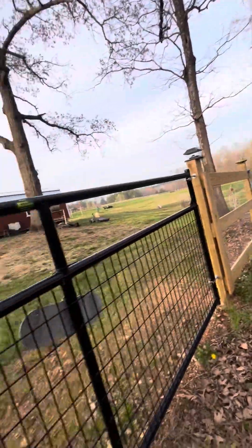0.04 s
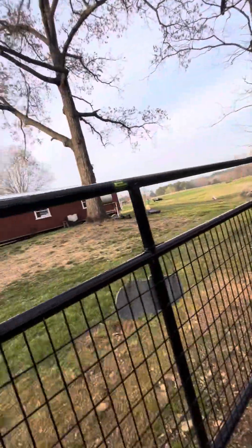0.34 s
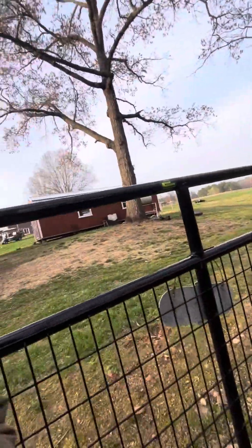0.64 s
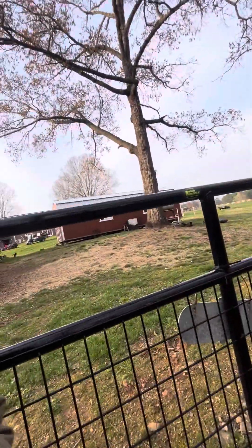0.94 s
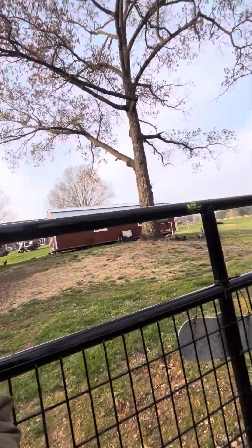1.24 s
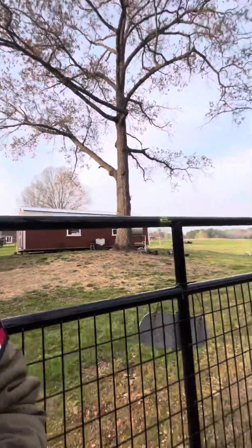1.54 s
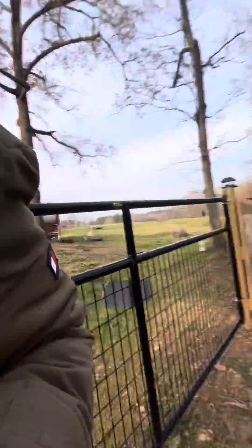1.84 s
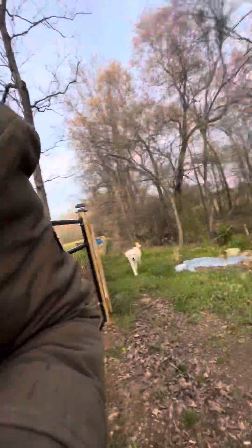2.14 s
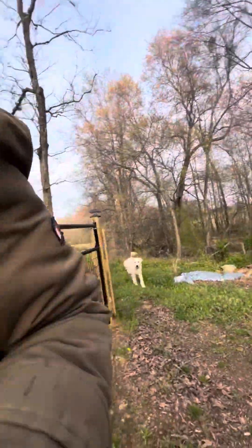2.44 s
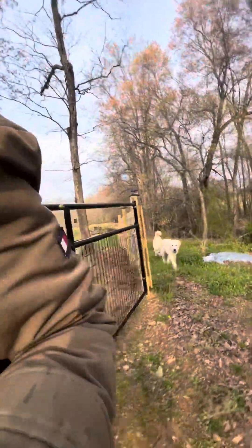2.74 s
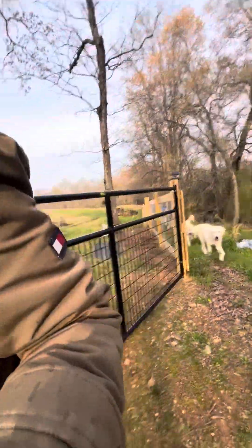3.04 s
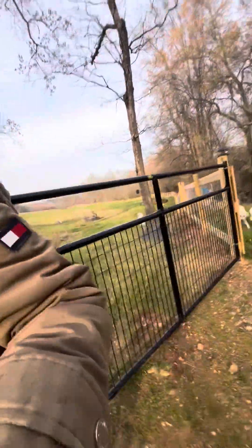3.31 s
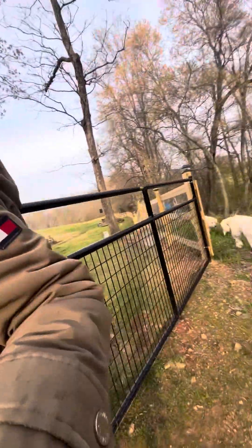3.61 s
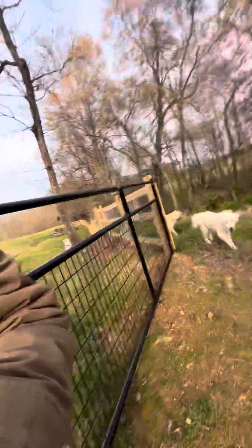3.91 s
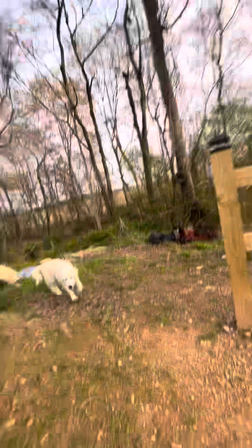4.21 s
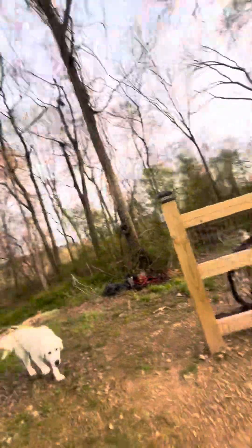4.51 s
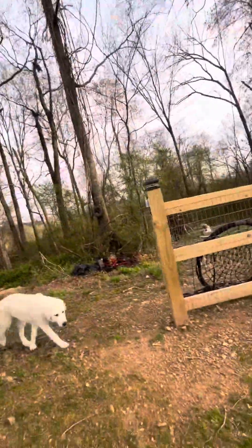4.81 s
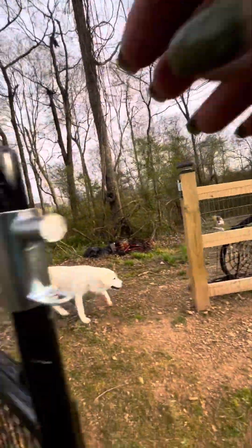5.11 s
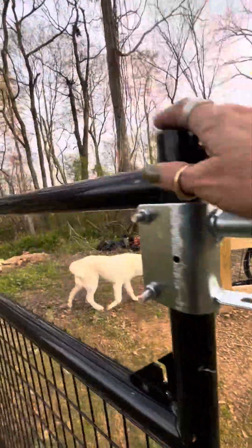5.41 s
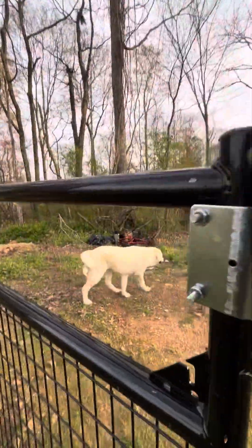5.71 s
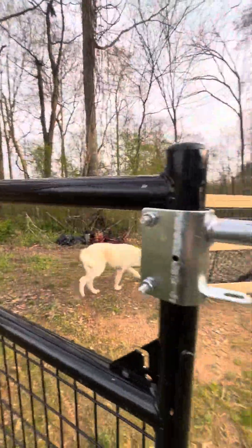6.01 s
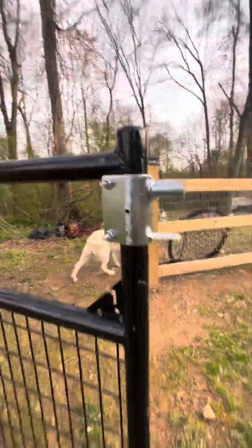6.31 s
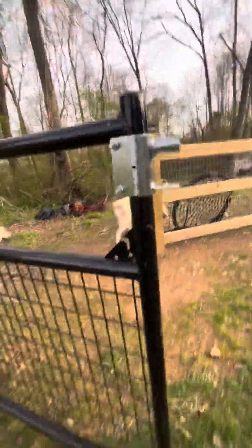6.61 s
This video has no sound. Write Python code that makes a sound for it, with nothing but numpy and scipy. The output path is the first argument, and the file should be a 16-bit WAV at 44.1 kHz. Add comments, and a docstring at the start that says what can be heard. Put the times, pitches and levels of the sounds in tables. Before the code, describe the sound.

A metal gate's bolt scrapes and clacks, then the frame clanks and rings briefly, with close handling knocks over a low hum.

```python
"""A tubular steel gate with mesh infill is unlatched and swung open, an arm's length from a hand-held phone.
The bolt scrapes and clacks, the frame clanks, the hinge pings, the mesh buzzes; the rail sings once let go.
Each contact rings the modes of a steel part. Fingers knock and creak on the phone's case.
A jacket and dry leaves rustle; a distant engine hums under the garden air."""
import sys
import numpy as np
from scipy import signal
from scipy.fft import rfft, irfft, next_fast_len
from scipy.io import wavfile
from scipy.ndimage import uniform_filter1d

SR = 44100
rng = np.random.default_rng(int(sys.argv[2]) if len(sys.argv) > 2 else 0)


def log_audio(samples):
    """Write samples as a 16-bit WAV file to the path given in sys.argv[1]."""
    # one column per channel
    frames = np.atleast_2d(samples).T
    # limit to full scale, then quantise
    limited = np.clip(frames, -1, 1)
    pcm = np.round(limited * 32767).astype(np.int16)
    wavfile.write(sys.argv[1], SR, pcm)


N = 297688

# Contacts on steel. Each row: start in seconds; crack, bass, mid, high and top levels in dB;
# left minus right in dB; chatter decay in seconds; mesh level in dB.
BOLT_SCRAPES = [(0.993, -24, -40, -31.5, -34, -51, -1.5, 0.027, -1),
                (1.058, -25, -39.5, -31, -34, -55, -2, 0.0048, 6),
                (1.069, -23, -40.5, -26, -33.5, -52, -3, 0.0045, 0),
                (1.079, -22, -41, -25.5, -34, -51, 1.5, 0.0035, -2.5),
                (1.108, -24, -35, -29, -36.5, -57, -2, 0.0042, 0),
                (1.339, -37, -31.5, -38, -42.5, -65, -4.5, 0.032, 17),
                (1.388, -27, -41, -40, -37.5, -54.5, 3, 0.004, 5)]
BOLT_CLACKS = [(1.412, -27, -49, -52, -41, -42, 1.2, 0.003, -12),
               (1.424, -19, -50, -40, -43, -49, 1.2, 0.0015, -7),
               (1.435, -25, -39, -43, -41, -45, 1.2, 0.0034, -5),
               (1.453, -24, -40, -43, -34, -37, 1.2, 0.007, -5),
               (1.461, 3.5, -17, -18.5, -17.5, -20.5, 1.3, 0.005, -5.5),
               (1.510, -27, -27.5, -24, -35.5, -26.5, 2.1, 0.018, -8)]
BRACKET_TAPS = [(1.603, -16, -45, -23, -22, -24.5, -1.5, 0.0021, 1.3)]
FRAME_CLANKS = [(1.233, -18, -33, -27, -31.5, -56, -5, 0.00079, -2),
                (1.77, -9, -32, -19.5, -27, -42.5, -1.5, 0.0018, -1.5),
                (3.674, -5, -30.5, -21, -18.5, -37.5, -5, 0.0027, 5),
                (3.694, -8, -38.5, -26, -23.5, -29, -3, 0.0043, -5),
                (3.941, -31, -54, -34.5, -45.5, -70, -3, 0.0022, 11),
                (4.127, -14, -38.5, -25, -23.5, -48, -2, 0.00084, 1),
                (4.144, -23, -38.5, -54, -33, -54, -7, 0.0012, -1)]
RING_CLICKS = [(5.3505, -12, -50, -54.5, -29.5, -45.5, -0.81, 0.001, -4)]
# Steel modes. Each row: frequency in Hz, level in dB, T60 in seconds.
LATCH_MODES = [(402,3,.11),(485,-8,.09),(655,-7,.08),(868,-7,.09),(973,-1,.1),(1237,-4,.2),(1632,-10,.08),(1741,-9,.1),(1955,-3,.11),(3040,-5,.04),(3760,-3,.05),(4308,-3,.07),(4800,-6,.05),(4890,-8,.05),(5001,-11,.1),(5900,-3,.07),(6540,-2,.05),(6585,-2,.06),(8350,-6,.08),(8400,-3,.14),(9255,-9,.12),(11860,-15,.12),(13845,-7,.1)]
BRACKET_MODES = [(1150,-5,.06),(1378,-12,.25),(2283,-7,.29),(2380,-6,.2),(2961,-8,.12),(3550,-6,.08),(3978,-4,.09),(4269,-2,.14),(4600,-1,.12),(4750,0,.1),(4810,1,.14),(5200,-3,.12),(5640,-4,.18),(6200,-5,.1),(7343,-6,.08),(7560,-4,.11),(8060,-5,.07),(11370,0,.064),(12100,-4,.07),(12800,-3,.06)]
FRAME_MODES = [(237,-16,1.5),(385,-17,.9),(506,-19,.7),(689,-9,.4),(1267,-9,.45),(1390,-11,.6),(1562,-8,.4),(1857,-13,.4),(2200,3,.3),(2300,-8,.3),(2440,-8,.22),(2657,-7,.2),(2702,-8,.22),(2960,-10,.16),(3140,-2.5,.2),(3356,1,.15),(3385,-2,.13),(4156,-9,.16),(4275,-2,.14),(4330,-3,.12),(4603,-12,.18),(4750,-8,.15),(5146,-7,.17),(5485,-6,.13),(5650,-8,.13),(6379,-5,.2),(6950,-10,.16),(7471,-1,.22)]
HINGE_MODES = [(2200,-12,.15),(3140,0,.13),(3165,-8,.08),(3356,-10,.1)]
POST_MODES = [(2410,-15,.08),(3370,-15,0.094),(3550,-10,.04),(5050,-1,0.016),(5206,0,0.02),(5600,-7,0.025),(6800,2.5,0.027),(7200,2,0.013),(7230,1,0.025)]
# Bolt sleeve and phone case. Each row: frequency in Hz, width in Hz, level in dB.
SLEEVE_RESONANCES = [(601,8.1,-9.5),(1143,37,-0.5),(1320,41,-7),(2246,16,-2),(2465,7.6,-1),(2690,31,-9.5),(2830,16,-13),(3890,37,2.5),(4290,15,-9.5),(4870,19,-5.5),(5160,100,8),(5840,61,8),(7300,46,0)]
CASE_RESONANCES = [(680,90,-1),(1550,280,0)]
# Rail notes, short while a hand holds the gate.
# Each row: start in seconds, frequency in Hz, level in dB, T60 in seconds, left phase lead in radians.
RAIL_NOTES = [(1.235,689.3,-38.5,1.9,2.4),(1.236,2200,-37.5,0.38,0.8),(1.235,5485,-40,.13,3),(1.235,5650,-41,.13,3.5),
              (1.771,237,-54,0.92,1.7),(1.773,689.3,-43,0.34,1.1),(1.772,2195,-36,0.21,1),(1.771,5485,-47,0.088,3.8),(1.773,5650,-40,0.1,2.3),
              (3.676,1262,-34.5,0.57,0.78),(3.676,689.3,-35.5,1.5,1.4),(4.129,689.3,-44,12.7,2.2)]
# Rail at the moving phone. Each row: time in seconds, gain in dB, left minus right in dB.
RAIL_PLACEMENT = [(1.25,6,-5.5),(2.2,14,-2.5),(3.7,-0.5,-16.5),(4.13,3,-9.5),(4.27,5.5,-7),(4.45,8,-7.5),(4.72,-0.5,-7.5),(5,5.5,-0.5),(5.6,4,-6),(6.75,3,3)]
# Short events. Each row: start in seconds, level in dB.
HINGE_PINGS = [(1.985,-46),(2.003,-47),(3.234,-44),(3.697,-22),(3.868,-38.5),(3.937,-44),(3.962,-44)]
MESH_SHIVERS = [(1.331,-40),(1.72,-50.5),(3.72,-45.5),(4.199,-45.5)]
DRY_SNAPS = [(0.285, -42), (2.6198, -44), (2.837, -41), (3.078, -36.5), (3.829, -34), (3.999, -39),
             (4.048, -34.5), (4.592, -38.5), (5.295, -37), (5.3044, -41.5), (5.7472, -41), (5.763, -31),
             (6.0322, -37.5), (6.1557, -45)]
# Knocks on the case. Each row: start in seconds, level in dB, centre in Hz, click level in dB,
# softness in dB per octave squared, travel time at 1 kHz in seconds.
CASE_KNOCKS = [(4.8151,-5.5,1770,-10,3.5,0.0021),(4.8249,-13,1630,2.5,4,.0025),(4.8244,-6.5,1100,-35.5,3,.003),(4.842,-20,1550,-40,15,0.0031),(4.8526,-22,764,-45,16,0.0031),(6.321,-36.5,1600,-26,0.5,.003),(6.4182,-36.5,1900,-13,1.5,0.0027),(6.469,-34,1000,-27,4,0.0028),(6.515,-22.5,1020,-31,6,0.0028),(6.537,-25,900,-26,4,0.00355),(6.567,-32,600,-24,8,0.0029),(6.588,-31.5,1440,-31,-0.5,0.0027),(6.593,-22.5,740,-40,6,0.0031),(6.6732,-11,1010,-39,10,.0022)]
# Hand jolts. Each row: centre in seconds, level in dB, frequency in Hz, half length in seconds.
HAND_BUMPS = [(2.147,-25.5,62.4,0.02),(5.172,-30.5,57.7,0.033)]
# Rubbing strokes. Each row: centre in seconds, level in dB, half length in seconds.
FINGER_RUBS = [(6.402,-49,0.045),(6.498,-47,0.029),(6.57,-55.5,0.028)]
JACKET_SWISHES = [(0.22,-66,0.3),(1.58,-57.5,0.42),(1.998,-55,0.04),(2.192,-58,0.075),(3.104,-56,0.03),(3.203,-54,0.11),(3.496,-54.5,0.094),(3.79,-48.5,0.086),(4.116,-52,0.099),(4.427,-54,0.088),(4.782,-51,0.055),(5.364,-62,0.1),(5.637,-54.5,0.032),(5.81,-55,0.05),(6.165,-60,0.073)]
# Shoe scuffs. Each row: peak time in seconds, level in dB, band anchor in Hz, rise and fall in seconds.
SHOE_SCUFFS = [(0.291,-52,2500,.007,0.035),(2.005,-51.5,2400,.02,0.022),(3.079,-51.5,1830,0.0041,0.08),(3.23,-48,2400,0.069,0.095),(4.32,-41.5,872,0.022,0.038),(4.5,-49.5,494,0.092,0.11),(4.63,-48.5,900,0.013,0.055),(4.766,-58,4000,0.2,0.25),(6.39,-57,2940,0.017,0.047),(6.49,-57.5,2920,0.023,0.027)]
# Engine speed. Each row: time in seconds, firing rate in Hz.
FIRING_HZ = [(0,115.1),(2.5,115.5),(3.1,110.7),(3.6,113.3),(4.6,112.2),(5.3,111),(6.75,105.6)]
# Engine note, and its octave relative to it. Each row: time in seconds, level in dB.
ENGINE_DB = [(0.0, -42.5), (1.09, -38.5), (1.26, -42.5), (2.56, -39), (2.71, -45), (2.74, -52.5),
             (3.44, -39), (5.08, -38.5), (5.15, -31.5), (5.3, -45), (5.36, -37.5), (5.86, -39.5),
             (5.94, -50.5), (6.03, -37.5), (6.15, -46.5), (6.75, -45.5)]
OCTAVE_DB = [(0,-31),(5.5,-31.5),(6.2,-11.5),(6.75,-14)]
# Open air. Each row: time in seconds, level in dB, an unused value.
AIR_DB = [(0,-54.5,0),(.6,-56,0),(2.3,-52.5,2),(2.9,-53,-2),(3.55,-53.5,1),(4.3,-51.5,2),(5.4,-54.5,22),(6.75,-52.5,-1)]
# Spectra and responses. Each row: frequency in Hz, gain in dB.
MESH_RADIATION_DB = [(1300,-0.5),(1450,-1.5),(1700,5),(3350,5),(3600,-3.5),(3850,0),(4250,9.5),(5000,5)]
MESH_SPECTRUM_DB = [(150,0),(320,-1.5),(600,-1),(1200,1.5),(1800,1.5),(2600,-12),(4000,-19.5),(8000,-37),(15000,-46)]
CASE_RESPONSE_DB = [(100,-3),(200,10.5),(400,-3),(600,-0.5),(850,-1.5),(1200,-2),(1600,1.5),(2000,-1),(2300,-7.5),(2700,-6),(3300,-20),(5000,-23),(8000,-66)]
CLICK_SPECTRUM_DB = [(300,-92),(1800,4),(2800,19.5),(3600,9.5),(4600,7),(6000,-9.5),(9000,-20),(16000,-42)]
RUSTLE_SPECTRUM_DB = [(300,1),(1500,-2),(3000,1.5),(4500,3.5),(6000,0),(8500,3),(10500,-15),(12500,6.5),(13800,-5),(15000,-23)]
RUMBLE_SPECTRUM_DB = [(20,-44),(35,-21),(50,1.5),(70,7),(95,4),(140,-3.5),(190,-12),(300,-37.5),(600,-70.5)]
AIR_SPECTRUM_DB = [(60,6.5),(160,-1),(300,3.5),(600,0.5),(1200,0.5),(1800,-3.5),(2600,-12),(4000,-23),(8000,-38.5),(15000,-87)]
RUSH_SPECTRUM_DB = [(400,-13),(950,2),(1650,3.5),(2200,-5.5),(4000,-28),(12000,-68)]
MIC_RESPONSE_DB = [(13800,-0.5),(15000,-24),(16000,-24.5)]
# Stereo width. Each row: frequency in Hz, side minus mid in dB.
WIDTH_DB = [(30,-32),(110,-3.5),(250,-7),(500,3),(1000,1),(2000,-2.5),(4200,7),(8000,3),(12000,-1.5)]


def gate():
    """The bolt slides in its sleeve and hits its stop; the bracket is tapped; the frame clanks."""
    sleeve_modes = [(hz, db, np.log(1000) / np.pi / width_hz) for hz, width_hz, db in SLEEVE_RESONANCES]
    sleeve = steel_part(sleeve_modes, mesh_t60_s=0.049, tail_db=-21.5, tail_t60_s=1.0)
    scrapes = blows(BOLT_SCRAPES, *sleeve, chatter_db=-6, crack_db=-4.5, level_db=-6.5, bounce_db=-13)
    latch = steel_part(LATCH_MODES, mesh_t60_s=0.041, tail_db=-14, tail_t60_s=0.41)
    clacks = blows(BOLT_CLACKS, *latch, chatter_db=-4, crack_db=-11.5, level_db=-8.5, bounce_db=-19)
    bracket = steel_part(BRACKET_MODES, mesh_t60_s=0.035, tail_db=-5, tail_t60_s=0.46)
    taps = blows(BRACKET_TAPS, *bracket, chatter_db=-27, crack_db=-35, level_db=-6, bounce_db=-25)
    frame = steel_part(FRAME_MODES, mesh_t60_s=0.17, tail_db=-14, tail_t60_s=0.85)
    clanks = blows(FRAME_CLANKS, *frame, chatter_db=-10.5, crack_db=-10.5, level_db=-8.5, bounce_db=-15.5)
    return scrapes + clacks + taps + clanks


def steel_part(modes, mesh_t60_s, tail_db, tail_t60_s, buzz_db=4.5):
    """Impulse responses of a part's modes and of the mesh, which buzzes unevenly and loses treble first."""
    t = np.arange(SR) / SR
    ring = mesh = 0
    for hz, db, t60_s in modes:
        phase = 2 * np.pi * hz * t + rng.uniform(0, 2 * np.pi)
        stereo_rad = np.array([[0], [rng.choice([-1, 1]) * np.pi / 2]])
        ring += undb(db) * fade(t, t60_s) * np.sin(phase + stereo_rad)
    for hz in 250 * 2 ** np.arange(6):
        octave = bandpass(rng.standard_normal((2, SR)), [hz, 2 * hz])
        life = (hz / 2000) ** -.4
        tail = undb(tail_db + buzz_db * walk(81.6)[:SR]) * fade(t, tail_t60_s * life)
        mesh += octave * (hz / 2000) ** -.3 * (fade(t, mesh_t60_s * life) + tail)
    mesh = colour(mesh, MESH_RADIATION_DB)
    return ring / rms(ring[:, :SR // 32]), mesh / rms(mesh[:, :SR // 32])


def blows(rows, ring, mesh, chatter_db, crack_db, level_db, bounce_db, bounce_per_s=64, bounce_s=0.063):
    """Each contact cracks, chatters and bounces; where and how hard it lands sets four band levels."""
    out, t = np.zeros((2, N)), np.arange(SR // 4) / SR
    edges_hz = np.array([200, 900, 2600, 6000, 14000])
    centres_hz = np.sqrt(edges_hz[1:] * edges_hz[:-1])
    for start_s, row_crack_db, *band_db, pan_db, chatter_s, mesh_db in rows:
        chatter = rng.standard_normal(len(t)) * (rng.random(len(t)) < 900 / SR)
        force = undb(chatter_db) * chatter * np.exp(-t / max(chatter_s, 1e-3))
        force += undb(bounce_db) * ticks(bounce_per_s, len(t), spread_db=0) * np.exp(-t / bounce_s)
        force[0] = 1  # first impact
        blow = wide(signal.fftconvolve(ring + undb(mesh_db) * mesh, force[None]))
        onset_rms = [rms(bandpass(blow[:, :SR // 32], band, 3)) for band in zip(edges_hz, edges_hz[1:])]
        blow = colour(blow, np.transpose([centres_hz, band_db - 20 * np.log10(onset_rms)]))
        crack = noise(RUSTLE_SPECTRUM_DB, len(t)) * fade(t, .015)
        blow[:, :len(t)] += undb(row_crack_db + crack_db) * crack
        add(out, start_s + 0.001498, undb(level_db) * pan(pan_db) * blow)
    return out


def hinge(pan_db=-3, attack_s=0.0025):
    """The loose hinge knocks in its play and rings high modes of the frame."""
    out, t = np.zeros((2, N)), np.arange(SR // 4) / SR
    stereo_rad = np.array([[np.pi / 2], [0]])
    for start_s, db in HINGE_PINGS:
        ping = sum(undb(db + mode_db) * fade(t, t60_s) * np.sin(2 * np.pi * hz * t + stereo_rad)
                   for hz, mode_db, t60_s in HINGE_MODES)
        add(out, start_s, pan(pan_db) * ping * np.minimum(t / attack_s, 1))
    return out


def rail(partner_gain=0.033, beat_hz=2.44):
    """Bending notes of the top rail beat with close partners and swell as the phone passes."""
    out, t = np.zeros((2, N)), np.arange(N) / SR
    for start_s, hz, db, t60_s, lead_rad in RAIL_NOTES:
        phase = 2 * np.pi * hz * (t + start_s) + np.array([[lead_rad], [0]])
        note = np.sin(phase) + partner_gain * np.sin(phase + 2 * np.pi * beat_hz * t)
        add(out, start_s, undb(db) * fade(t, t60_s) * note)
    side_db = np.array([[1], [-1]]) * curve(RAIL_PLACEMENT, column=2) / 2
    return out * undb(curve(RAIL_PLACEMENT) + side_db)


def mesh_shiver(rise_s=0.01, hold_s=0.14, t60_s=1.0):
    """Loose wires buzz against the frame after a jolt."""
    t = np.arange(N) / SR
    motion = 0
    for start_s, db in MESH_SHIVERS:
        rise = np.clip((t - start_s) / rise_s, 0, 1)
        release = fade(np.maximum(t - start_s - rise_s - hold_s, 0), t60_s)
        motion += undb(db) * rise * release
    wires = wide(colour(rng.standard_normal((2, N)) * undb(2.5 * walk(90)), MESH_SPECTRUM_DB))
    return unit_rms(wires) * motion


def case_knocks(left_lag_s=0.00017, pan_db=5, level_db=3, click_db=2, rattle_db=-7.5, rattle_t60_s=0.054):
    """Bending waves arrive treble first: each knock is a falling chirp that rings and rattles the case."""
    out, size, lead_s = np.zeros((2, N)), 8192, .01
    hz, t = np.arange(size // 2 + 1) * SR / size, np.arange(size) / SR - lead_s
    resonances = sum(undb(db) * width_hz / (width_hz + 2j * (hz - mode_hz))
                     for mode_hz, width_hz, db in CASE_RESONANCES)
    case = gains(size, CASE_RESPONSE_DB) * (1 + resonances)
    delay_s = lead_s + np.array([[left_lag_s], [0]])
    for start_s, db, centre_hz, row_click_db, soft_db, travel_s in CASE_KNOCKS:
        # group delay goes as 1 / sqrt(frequency)
        travel = np.exp(-2j * np.pi * (2 * travel_s * np.sqrt(1000 * hz) + hz * delay_s))
        contact = undb(-abs(soft_db) * np.log2((hz + 1) / centre_hz) ** 2)
        thud = irfft(case * contact * travel)
        click = irfft(gains(size, CLICK_SPECTRUM_DB) * travel)
        rattle = irfft(case * contact * rfft(rng.standard_normal((2, size))))
        rattle *= fade(abs(t), rattle_t60_s) * np.clip(t / travel_s - 1, 0, 1)
        knock = thud / abs(thud).max() + undb(row_click_db + click_db) * click / abs(click).max()
        knock += undb(rattle_db) * rattle
        add(out, start_s - lead_s, undb(db + level_db) * pan(pan_db) * knock)
    return out


def grip(pan_db=4, skin_db=-9, slips_per_s=340):
    """A finger ring clicks on the post; the other hand sticks and slips on the phone's case."""
    post = steel_part(POST_MODES, mesh_t60_s=0.014, tail_db=-12, tail_t60_s=0.45)
    click = blows(RING_CLICKS, *post, chatter_db=-15, crack_db=-13, level_db=-7.5, bounce_db=-16)
    slips = colour(ticks(slips_per_s, N, spread_db=-3.5), CASE_RESPONSE_DB)
    creak = pan(pan_db) * slips / np.std(slips) + undb(skin_db) * crunch(CASE_RESPONSE_DB)
    return click + creak * strokes(FINGER_RUBS)


def hand_bumps():
    """The phone jolts in the hand: a few slow swings of pressure."""
    t = np.arange(N) / SR
    return sum(undb(db) * swell(centre_s, half_s) * np.sin(2 * np.pi * hz * (t - centre_s))
               for centre_s, db, hz, half_s in HAND_BUMPS)


def jacket(creases_per_s=60, crease_db=-5, rub_db=-3, idle_db=-64.5):
    """Cloth rubs, faintly between strokes; its creases tick with each stroke."""
    motion = strokes(JACKET_SWISHES)
    creases = np.array([ticks(creases_per_s, N), ticks(creases_per_s, N)])
    creases = unit_rms(wide(colour(creases, RUSTLE_SPECTRUM_DB)))
    rub = undb(rub_db) * crunch(RUSTLE_SPECTRUM_DB) * (motion + undb(idle_db))
    return rub + undb(crease_db) * creases * motion


def leaves():
    """Dry leaves crunch at each scuff of a shoe."""
    out = np.zeros((2, N))
    grains = crunch([(200, 24), (16000, -42)], spread_db=2.5)
    for peak_s, db, hz, rise_s, fall_s in SHOE_SCUFFS:
        scuff = unit_rms(bandpass(grains, [hz / 1.16, hz * 2.23]))
        out += undb(db) * scuff * swell(peak_s, rise_s, fall_s)
    return out


def snaps(clear_db=-0.5, faint_db=-43.5, faint_per_s=2.2):
    """Cloth and leaves snap: clear ones at set times, faint ones at random."""
    out, t = np.zeros((2, N)), np.arange(SR // 16) / SR
    envelope = fade(t, .01) + undb(-20) * fade(t, .08)
    clear = [(start_s, db + clear_db) for start_s, db in DRY_SNAPS]
    faint = [(when * N / SR, faint_db - 8 * weakness) for when, weakness, draw in rng.random((64, 3))
             if draw < faint_per_s * N / SR / 64]
    for start_s, db in clear + faint:
        add(out, start_s, undb(db) * envelope * noise(RUSTLE_SPECTRUM_DB, len(t)))
    return out


def engine(waver_db=1.1, speed_wobble=0.0037):
    """A far engine slows and wavers; only its firing note and a weak octave carry."""
    firing_hz = curve(FIRING_HZ) * (1 + speed_wobble * walk(15))
    phase = 2 * np.pi * np.cumsum(firing_hz) / SR
    note = np.sin(phase) + undb(curve(OCTAVE_DB)) * np.sin(2 * phase)
    return np.sqrt(2) * undb(curve(ENGINE_DB) + waver_db * walk(12)) * note


def open_air(rumble_db=-46, gust_db=2.5, flutter_db=-0.17):
    """Gusting low rumble under the soft hiss of open air."""
    rumble, air = unit_rms(noise(RUMBLE_SPECTRUM_DB)), unit_rms(noise(AIR_SPECTRUM_DB))
    rumble *= undb(rumble_db + gust_db * walk(2.91))
    air *= undb(curve(AIR_DB) + flutter_db * walk(9.8))
    return rumble + air


def distant_rush(peak_s=0.78, rise_s=0.68, fall_s=0.87, level_db=-52.5, pan_db=-3):
    """A soft midrange rush swells on the right and sinks again."""
    return pan(pan_db) * unit_rms(noise(RUSH_SPECTRUM_DB)) * undb(level_db) * swell(peak_s, rise_s, fall_s)


def crunch(spectrum_db, spread_db=0.5, clump_db=3.5):
    """Dense 32-sample grains of unequal size, in clumps."""
    sizes = rng.exponential(size=N // 32 + 1).repeat(32)[:N].clip(0, 6)
    grains = rng.standard_normal((2, N)) * undb(spread_db * sizes + clump_db * walk(35))
    return unit_rms(wide(colour(grains, spectrum_db)))


def ticks(per_s, samples, spread_db=4):
    """Irregular contacts: impulses of random size and sign."""
    draw, size, sign = rng.random((3, samples))
    return (draw < per_s / SR) * undb(spread_db * (2.6 * size - 2)) * np.sign(sign - .5)


def noise(spectrum_db, samples=N):
    """Coloured stereo noise."""
    return wide(colour(rng.standard_normal((2, samples)), spectrum_db))


def walk(rate_hz):
    """Smooth random drift, spread near 1."""
    step = int(SR / rate_hz)
    return uniform_filter1d(np.repeat(rng.standard_normal(N // step + 1), step), step)[:N]


def strokes(rows):
    """Envelope of summed swells."""
    return sum(undb(db) * swell(centre_s, half_s) for centre_s, db, half_s in rows)


def swell(peak_s, rise_s, fall_s=None):
    """Gaussian envelope, symmetric unless a fall is given."""
    t = np.arange(N) / SR - peak_s
    return np.exp(-(t / np.where(t < 0, rise_s, fall_s or rise_s)) ** 2)


def fade(t, t60_s):
    """Exponential decay."""
    return np.exp(-np.log(1000) * t / max(t60_s, 1e-3))


def curve(rows, column=1):
    """Table column, interpolated over time."""
    rows = np.array(rows)
    return np.interp(np.arange(N) / SR, rows[:, 0], rows[:, column])


def gains(size, spectrum_db):
    """Spectrum as gains at the FFT bins."""
    hz, db = np.transpose(spectrum_db)
    bins_hz = np.arange(size // 2 + 1) * SR / size
    return undb(np.interp(np.log(bins_hz + 1), np.log(hz), db))


def colour(x, spectrum_db):
    """Zero-phase FFT filter."""
    size = next_fast_len(x.shape[-1] + 2048)
    return irfft(rfft(x, size) * gains(size, spectrum_db), size)[..., :x.shape[-1]]


def bandpass(x, band_hz, order=2):
    """Causal band filter."""
    return signal.sosfilt(signal.butter(order, band_hz, "band", fs=SR, output="sos"), x)


def wide(pair):
    """Narrow in the bass, wide in the treble."""
    side = colour((pair[0] - pair[1]) / 2, WIDTH_DB)
    return pair.mean(axis=0) + np.array([side, -side])


def pan(db):
    """Channel gains for left minus right in dB."""
    return undb(np.array([[db], [-db]]) / 2)


def undb(db):
    """Decibels to gain."""
    return 10 ** (np.asarray(db) / 20)


def rms(pair):
    """RMS of the mid signal."""
    return np.sqrt(np.mean(pair.mean(axis=0) ** 2)) + 1e-12


def unit_rms(pair):
    """Scale to a mid RMS of 1."""
    return pair / rms(pair)


def add(out, start_s, x):
    """Mix x into out."""
    i = int(start_s * SR)
    out[:, i:i + x.shape[1]] += x[:, :N - i]


def scene():
    """Gate, hands and garden."""
    steel = gate() + hinge() + rail() + mesh_shiver()
    hands = case_knocks() + grip() + hand_bumps()
    return steel + hands + jacket() + leaves() + engine() + open_air() + snaps() + distant_rush()


def record(dry, ceiling=0.95, top_hz=15800):
    """The phone colours the sound, clips peaks and cuts the top."""
    clipped = np.clip(colour(dry, MIC_RESPONSE_DB), -ceiling, ceiling)
    return signal.sosfilt(signal.ellip(8, .2, 70, top_hz, fs=SR, output="sos"), clipped)


dry = scene()
out = record(dry)
log_audio(out)
```